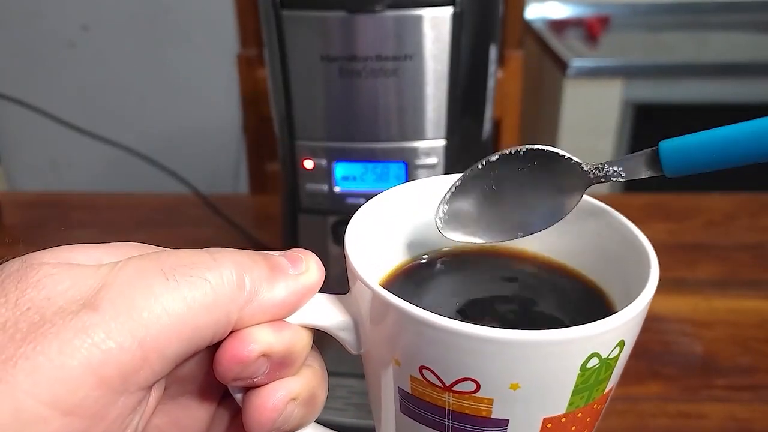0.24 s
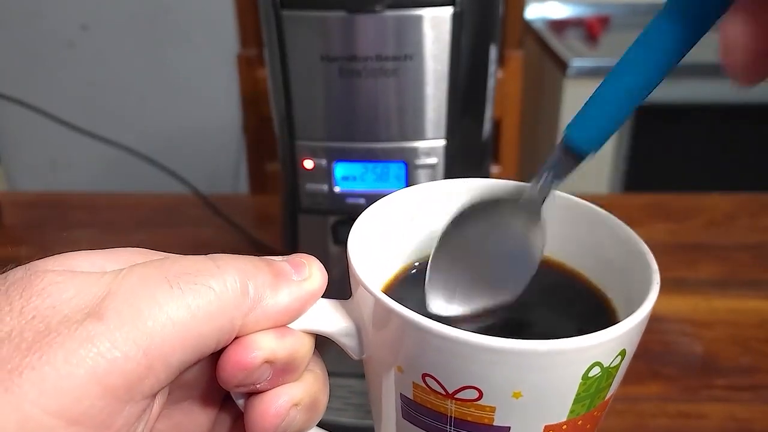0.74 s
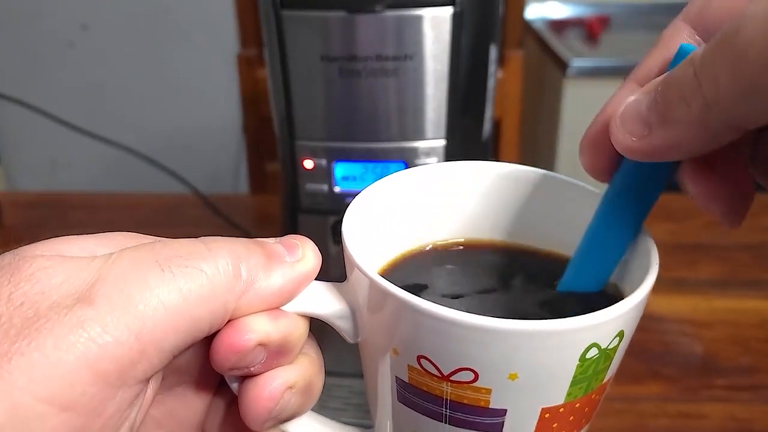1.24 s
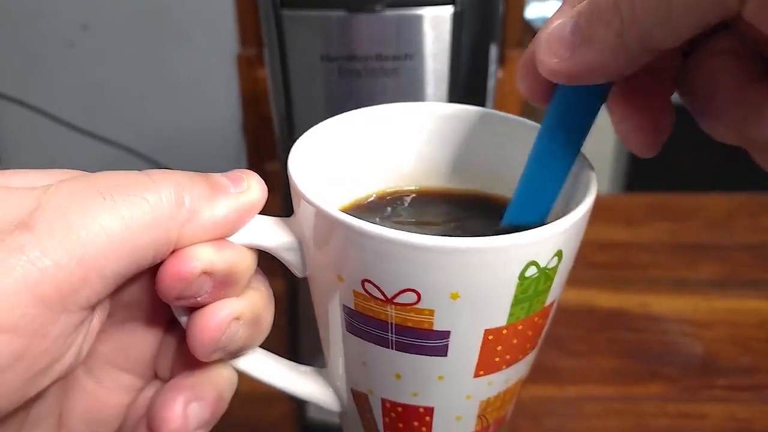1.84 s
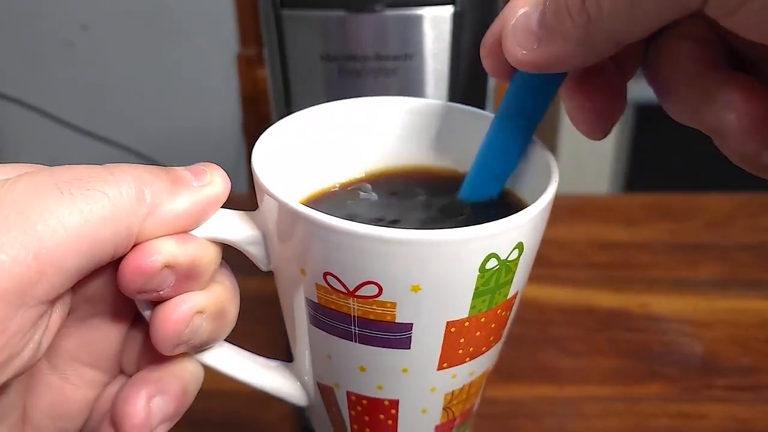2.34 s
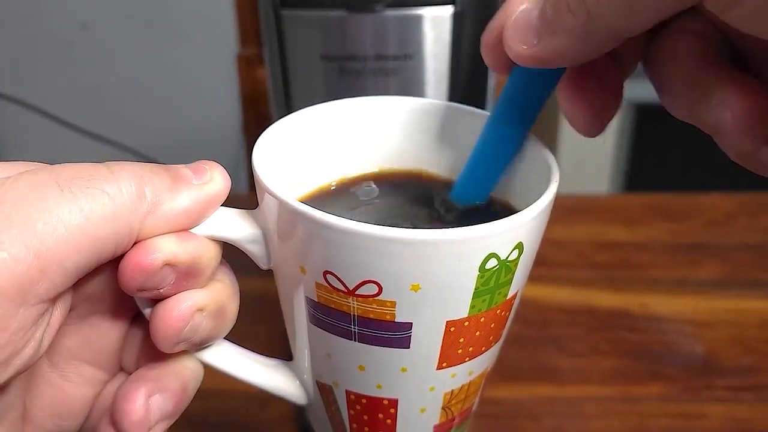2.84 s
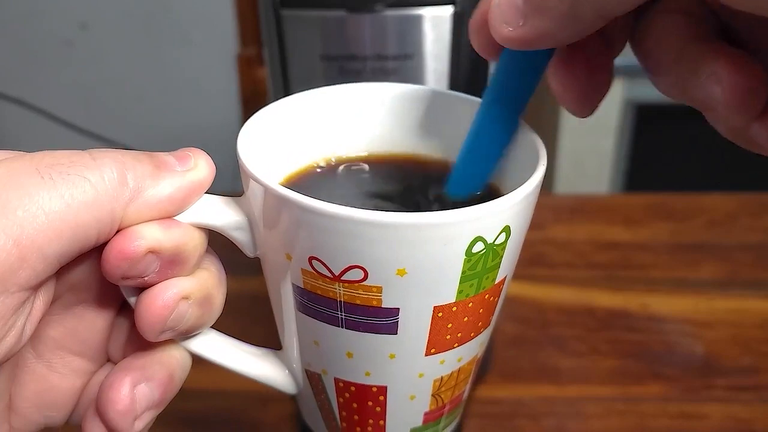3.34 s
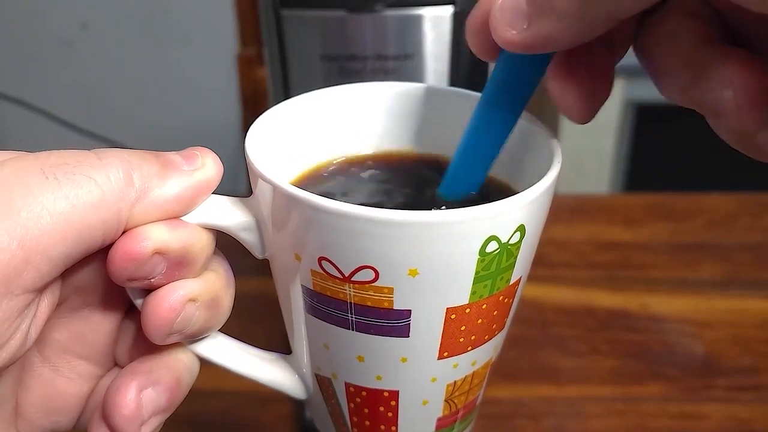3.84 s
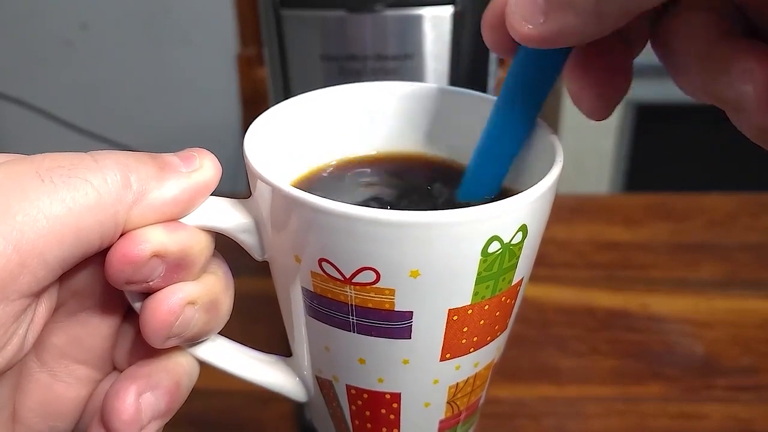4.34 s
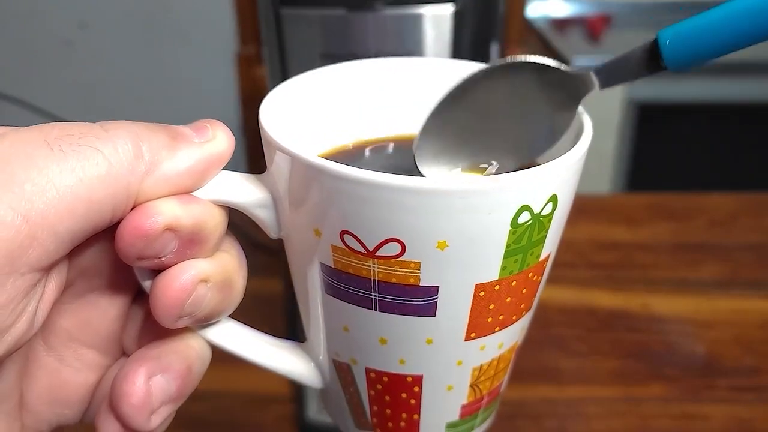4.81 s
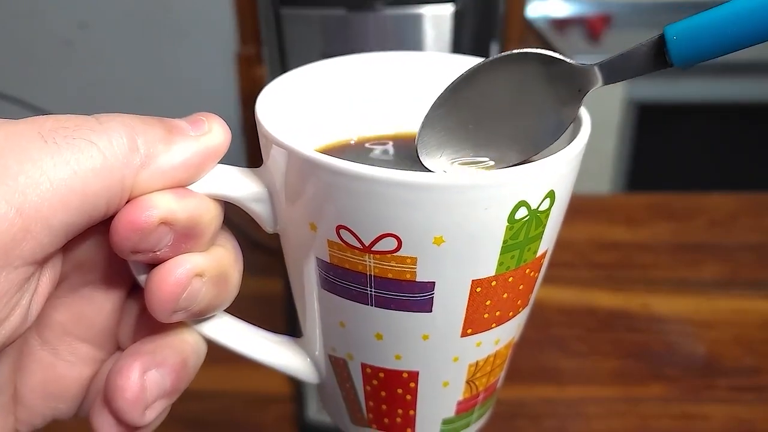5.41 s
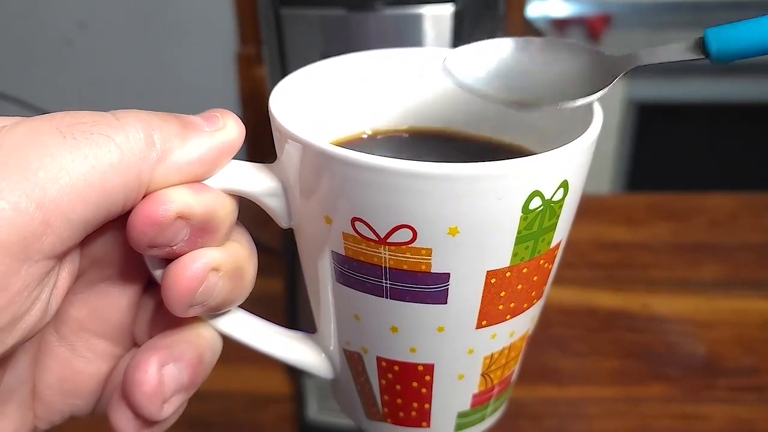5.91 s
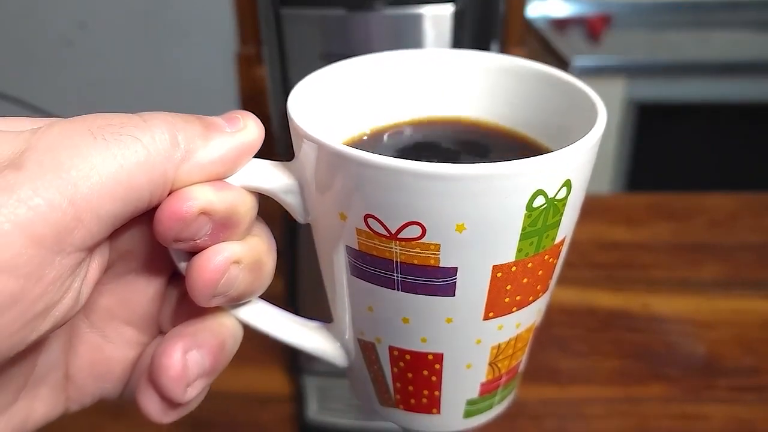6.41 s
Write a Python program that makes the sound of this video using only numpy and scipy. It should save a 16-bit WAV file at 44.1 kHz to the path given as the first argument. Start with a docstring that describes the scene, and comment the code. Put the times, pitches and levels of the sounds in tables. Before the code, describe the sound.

A teaspoon and ceramic mug heard very close, with short kitchen reflections. A barely audible trickle of sugar, a hard bright clink, then about three seconds of irregular small taps, wet and damped by the drink, with thin scrapes along the wall. A pause, then strong high rim taps with short ringing, weaker ones, and a last clink. Faint low hum and room noise; hiss dips after loud hits.

```python
"""A steel teaspoon knocks sugar into a ceramic mug, stirs the drink and is tapped dry on the rim.
Each contact is a noise crack plus decaying modes of mug and spoon; some modes sing on afterwards.
Between taps the spoon drags along the wall (stick-slip pulses) and the drink laps (short bubble rings).
A small kitchen answers, over mains hum and low room noise; a noise suppressor hushes the hiss
after loud clinks."""
import sys
import numpy as np
from scipy import signal
from scipy.fft import rfft, irfft
from scipy.io import wavfile
from scipy.ndimage import uniform_filter1d

SR = 44100
rng = np.random.default_rng(int(sys.argv[2]) if len(sys.argv) > 2 else 0)


def dump(signal):
    """Clip the signal to [-1, 1] and save it as 16-bit WAV at the path in sys.argv[1]."""
    limited = np.clip(np.atleast_2d(signal).T, -1, 1)
    pcm = np.round(limited * 32767).astype(np.int16)
    wavfile.write(sys.argv[1], SR, pcm)


N = 293946

# Modes: (frequency [Hz], level [dB], t60 [s], level change with the spoon deep in the drink [dB])
# the mug's oval modes, split by its handle
MUG_LOW_MODES = [(830, -22, .035, -2), (1557, -6, 0.18, 2.5), (1652.6, 12, 0.13, -7),
                 (1730, -5.5, 0.075, -22)]
# the spoon's bowl
SPOON_MODES = [(4690, -26, .22, -10), (4753, -20, .24, -12), (4830, -26, .22, -14), (5440, -7, .04, 0),
               (5522, 0, .05, 3), (6400, -6, .04, -8), (6490, -2, .06, -9), (8050, -15, .1, 2),
               (8400, -16, .17, -1), (10440, -28, .26, -10), (11590, -27, .22, -8)]
# stiff, quickly damped modes that only a sharp blow reaches
BRIGHT_MODES = [(7420, 9.5, 0.032, -24.5), (7700, -1.5, .02, -31.5), (8180, 6, 0.012, -3.5),
                (8610, -1.5, 0.023, 13.5), (8817, 2.5, 0.12, -6.5), (10050, -16.5, 0.031, 16),
                (10335, -10.5, 0.064, 6), (10560, -8, 0.08, 8), (11600, -18, 0.042, 18),
                (13150, -15.5, 0.044, 12), (13500, -10, 0.05, -2), (15200, -3, 0.033, -2),
                (15600, -15, .03, -8)]
# dull modes of spoon and mug in touch
DULL_MODES = [(1900, 0, .02, -3), (2070, -7, .11, -2), (2500, -8, .1, 0), (2900, -7, .06, -2),
              (3260, -9, .08, -3), (3660, -7, .08, 3), (4450, -3, .02, 0), (4850, 0, .02, 0)]

DEEP_FROM_S, DEEP_TO_S = 1, 4.4  # the spoon is deep in the mug


def amp(db):
    """Decibels to gain."""
    return 10 ** (np.asarray(db) / 20)


def unit(x):
    """Scales to rms 1."""
    return x / np.sqrt(np.mean(x ** 2) + 1e-20)


def read(points, hz):
    """Interpolates (frequency, value) points on a log-frequency axis."""
    point_hz, value = np.transpose(points)
    return np.interp(np.log(hz + 1), np.log(point_hz + 1), value)


def coloured(x, spectrum):
    """Filters x by a spectrum in dB, at rms 1."""
    hz = np.fft.rfftfreq(len(x), 1 / SR)
    return unit(irfft(rfft(x) * amp(read(spectrum, hz)), len(x)))


def wander(hz):
    """Random modulation of rms 1, up to about hz changes a second."""
    f = np.fft.rfftfreq(N, 1 / SR)
    return unit(irfft(rfft(rng.standard_normal(N)) * np.exp(-(f / hz) ** 2), N))


def add(mix, s, sound):
    """Mixes a sound in at time s."""
    part = mix[round(s * SR):][:len(sound)]
    part += sound[:len(part)]


def dying(t, t60):
    """Exponential decay: falls by 60 dB in t60 seconds."""
    return np.exp(-np.log(1000) * t / max(t60, 1e-3))


def stroke(start_s, length_s, attack_s, release_t60):
    """Envelope of one movement: it rises, holds until its length is over and dies away."""
    t = np.arange(N) / SR - start_s
    return np.clip(t / attack_s, 0, 1) * dying(np.maximum(t - length_s, 0), release_t60)


def ring(t, modes, deep, vary_db, detune=0.00035):
    """Decaying modes; every point of contact weights and loads them a little differently."""
    total = 0
    for hz, db, t60, deep_change_db in modes:
        level_chance, pitch_chance = rng.standard_normal(2)
        gain = amp(db + deep * deep_change_db + vary_db * level_chance)
        mode_hz = hz * (1 + detune * pitch_chance)
        total = total + gain * dying(t, t60) * np.sin(2 * np.pi * mode_hz * t)
    return total


def patchy(x, depth_db, frames, bins):
    """The point of contact wanders, so single bands swell and fade."""
    z = signal.stft(x, nperseg=256)[2]
    patches = uniform_filter1d(rng.standard_normal(z.shape), bins, axis=0)
    patches = unit(uniform_filter1d(patches, frames, axis=1))
    return unit(signal.istft(z * amp(depth_db * patches), nperseg=256)[1][:N])


def rubbed(drive, ring_db, mug_db=-9):
    """Steady rubbing feeds the modes of spoon and mug."""
    t = np.arange(SR // 8) / SR
    body = ring(t, DULL_MODES + BRIGHT_MODES + SPOON_MODES, deep=True, vary_db=5.5)
    body = body + amp(mug_db) * ring(t, MUG_LOW_MODES, deep=True, vary_db=1.5)
    resonance = unit(signal.fftconvolve(drive, body)[:N])
    return patchy(drive + amp(ring_db) * resonance, depth_db=2.8, frames=12, bins=4)


def background(rumble_db=-52, hiss_db=-66, waver=0.52, sway_rad=0.43):
    """Hum lines wavering in level and phase, over low room noise and a faint hiss."""
    # mains hum and fan: (frequency [Hz], rms level before the waver [dB])
    hum_lines = [(60.1, -53), (78.5, -68.5), (119.8, -84), (180.2, -58), (241, -68.5), (301, -66.5),
                 (361, -72), (421, -70)]
    # low room noise: (frequency [Hz], density [dB per Hz])
    rumble_colour = [(20, 8), (35, 0), (48, 0), (80, 6), (140, -0.5), (280, -3), (420, -5.5), (560, -12.5),
                     (750, -18), (1050, -25), (1400, -44.5), (2200, -68), (5000, -70)]
    # hiss: (frequency [Hz], density [dB per Hz])
    hiss_colour = [(500, -13), (1050, -1), (1650, 0.5), (2000, -5.5), (2140, 0.5), (2350, -7), (3000, -9.5),
                   (3750, -12), (4300, -19), (7500, -14.5), (9500, -27), (16000, -40)]
    t = np.arange(N) / SR
    hum = np.zeros(N)
    for hz, db in hum_lines:
        level = amp(db) * np.sqrt(2) * (1 + waver * wander(20))
        phase = 2 * np.pi * (hz * t + rng.random()) + sway_rad * wander(2.3)
        hum += level * np.sin(phase)
    rumble = amp(rumble_db) * coloured(rng.standard_normal(N), rumble_colour)
    hiss = amp(hiss_db) * coloured(rng.standard_normal(N), hiss_colour)
    return hum + rumble + hiss


def sugar(level_db=-74, pour_s=.07):
    """Fine crystals slide off the spoon and trickle into the drink: coloured noise."""
    # (frequency [Hz], density [dB per Hz])
    sugar_colour = [(1500, -9), (3700, 9.5), (5000, 0.5), (6800, -9.5), (8300, -8), (9500, -21),
                    (11000, -14), (16000, -21)]
    trickle = amp(level_db) * coloured(rng.standard_normal(N), sugar_colour)
    return trickle * stroke(0, pour_s, attack_s=0.0037, release_t60=.5)


def stirring(level_db=-74.5, swing_db=2.5, turns_hz=2.3, peak_s=1.22):
    """Gain of the drink's motion: one swell for each turn while the spoon is in it."""
    sweep = np.cos(2 * np.pi * turns_hz * (np.arange(N) / SR - peak_s))
    stay = stroke(DEEP_FROM_S, DEEP_TO_S - DEEP_FROM_S, attack_s=0.24, release_t60=.3)
    return amp(level_db + swing_db * sweep) * stay


def swirl(bubbles_per_s=1400, size_db=2, decay_cycles=12, pitches=24):
    """Tiny bubbles and lappings around the spoon, each a short ring, heard through the mug."""
    # (frequency [Hz], density [dB per Hz])
    swirl_colour = [(500, -20.5), (1500, -6.5), (2400, -14), (3600, 23), (5000, 14), (8000, 5),
                    (12000, -19.5), (16000, -35.5)]
    t, bubbles = np.arange(2048) / SR, np.zeros(N)
    for hz in np.geomspace(1300, 7000, pitches):
        starts = rng.random(N) < bubbles_per_s / pitches / SR
        pops = starts * amp(size_db * np.minimum(rng.exponential(1, N), 3))
        bubble = np.sin(2 * np.pi * hz * t) * t * hz * np.exp(-2 * np.pi * t * hz / decay_cycles)
        bubbles += signal.oaconvolve(pops, bubble)[:N]
    drive = coloured(unit(bubbles) + .4 * rng.standard_normal(N), swirl_colour)
    return rubbed(drive, ring_db=3.5) * stirring()


def pressure(swell_db=3, attack_s=0.013, release_t60=0.29):
    """Gain of the drags: each catches quickly, presses harder along its length and lets go."""
    # spoon on the glaze: (start [s], length [s], level at the end of the swell [dB])
    drags = [(1.514, 0.24, -53.5), (2.614, 0.18, -64.5), (3.18, 0.065, -56.5)]
    t, gain = np.arange(N) / SR, np.zeros(N)
    for s, length_s, db in drags:
        remaining = np.clip(1 - (t - s) / length_s, 0, 1)
        gain += amp(db - swell_db * remaining) * stroke(s, length_s, attack_s, release_t60)
    return gain


def scrape(slip_hz=900, drift=.1, jitter=0.26, grit=0.43, uneven_db=2.0, lean_db=2.0):
    """The spoon's edge sticks and slips unevenly on the glaze, with sugar grit under it."""
    # (frequency [Hz], density [dB per Hz])
    scrape_colour = [(600, 2), (1600, 2.5), (2700, 7.5), (4000, 1.5), (6000, 6), (8000, -0.5), (10500, -4),
                     (13500, 2), (15500, -4), (16500, -17)]
    slips_per_s = slip_hz * np.exp(drift * wander(6.4) + jitter * wander(900))
    slips = np.diff(np.floor(np.cumsum(slips_per_s) / SR), prepend=0)  # one pulse a slip
    drive = unit(slips - slips.mean()) + grit * rng.standard_normal(N)
    drive = coloured(drive * amp(uneven_db * wander(90)), scrape_colour)
    return rubbed(drive, ring_db=-4.0) * pressure() * amp(lean_db * wander(19))


def sings(spread=.014, count=9):
    """Modes left ringing freely after contact: close clusters of sines beating together."""
    # spoon or mug after the two part: (time [s], frequency [Hz], level [dB], t60 [s])
    singing_modes = [(.505, 4765, -37.5, .28), (.505, 2506, -47, 0.37), (2.354, 7360, -60.5, 0.51),
                     (2.683, 1670, -61, .45), (2.917, 7460, -62.5, .26), (3.481, 1680, -49, .5),
                     (3.755, 7450, -54.5, 0.45), (4.832, 4750, -48.5, 0.58), (5.003, 4730, -48.5, 0.43),
                     (5.235, 4700, -52, .42)]
    out, t = np.zeros(N), np.arange(SR // 2) / SR
    for s, hz, db, t60 in singing_modes:
        cluster = 0
        for chance in rng.standard_normal(count):
            cluster = cluster + np.sin(2 * np.pi * hz * (1 + spread * chance) * t)
        add(out, s, amp(db) * cluster / np.sqrt(count) * dying(t, t60))
    return out


def contact_colour(x, depth_db, width_hz=700):
    """Every point of contact favours some broad bands and misses others."""
    hz, knots_hz = np.fft.rfftfreq(len(x), 1 / SR), np.arange(0, SR / 2, width_hz)
    ripple_db = depth_db * np.interp(hz, knots_hz, rng.standard_normal(len(knots_hz)))
    return irfft(rfft(x) * amp(ripple_db), len(x))


def crack(t, spectrum, t60):
    """The crowd of heavily damped modes at the moment of contact: decaying coloured noise."""
    noise = contact_colour(rng.standard_normal(len(t)), depth_db=1.5)
    return coloured(noise, spectrum) * dying(t, t60)


def struck(x, db):
    """Sets the rms of a blow's first 20 ms."""
    return amp(db) * x / np.sqrt(np.mean(x[:SR // 50] ** 2))


def share(hardness, back_db, edge_db):
    """A blow's share in dB over its strength, from the spoon's back to its edge."""
    return back_db + hardness * (edge_db - back_db)


def taps(touch_s=0.011, rise_s=0.00086, knock_noise_db=1, dull_db=-7, tick_noise_db=-6,
         wet_noise_db=4, loading=0.011, firm_db=-52, drowned_db=-15.5, mug_hold=0.56, spoon_hold=1.35):
    """Steel meets ceramic: a crack, then both bodies ring, losing most while they stay in touch."""
    # hardness 0 is the spoon's back, 1 its edge: (time [s], strength [dB], hardness [0-1],
    # wall ring over the strength [dB], ring lost while the two stay in touch [dB])
    contacts = [(.5043, -29.5, 0.75, -7.5, 23), (1.0867, -58, 0.75, -19, 18), (1.09, -51, 0, -27, 43),
                (1.327, -60, 0.16, -31, 0), (1.523, -66.5, 1, -8, 35.5), (1.6308, -48, 0.06, -7, 33),
                (1.913, -64, .35, -41, 0.5), (1.9565, -66, .4, -5, -15), (2.0536, -44.5, .9, -1, 16),
                (2.233, -52, .0, -11.5, 37), (2.2736, -57, 0.56, -12, -3), (2.3035, -51, 0.1, -14, 31),
                (2.3559, -52.5, 0.24, -64, 23), (2.6811, -53, 0.71, 7.5, 7), (2.781, -57, 0.6, -8, 3),
                (2.824, -49.5, .05, -12, 26), (2.92, -55.5, 0.21, -50, 17), (2.987, -52, 0.31, -19, 5),
                (3.287, -59.5, .95, -12, 21.5), (3.314, -58.5, .1, -4.5, 2.5),
                (3.341, -50.5, 0.14, -20, 40), (3.4807, -43.5, 0.56, 21, 9), (3.668, -48, 1, 2, 11.5),
                (3.758, -47, 0.3, -32, 24), (4.0015, -54, .55, -10, 17), (4.004, -49.5, 0.54, -9, -9),
                (4.1322, -45.5, 0.94, -2, 15), (4.2823, -51, 0.1, 4, -3), (4.347, -49.5, .0, -20, 24.5),
                (4.4333, -48.5, 0.34, 5, -1.5), (4.8311, -34, 0.66, 9, 9), (5.003, -39, 0.58, 8, 18),
                (5.2342, -38.5, 0.56, 6, 7), (5.4514, -49.5, 0.42, 7, 15), (5.6506, -51.5, 0.45, 6.5, 28.5),
                (5.835, -41, .6, 17.5, 13)]
    # higher wall modes: (frequency [Hz], level [dB], t60 [s], level change deep in the drink [dB])
    mug_high_modes = [(4737, -12.5, 0.19, 1), (5730, -13.5, .04, 25.5), (5710, 4, .075, -32),
                      (6870, -6, 0.067, 6.5), (8040, -20.5, .2, 4.5), (8780, -17.5, 0.047, -2.5),
                      (10830, -24, .16, -11), (14250, -31, .11, -6.5), (15300, -27.5, .11, -8.5)]
    # dull contact noise: (frequency [Hz], density [dB per Hz])
    knock_colour = [(300, -44), (650, -24.5), (850, -9), (1050, -21), (1500, 5), (2200, 3.5), (2900, -1.5),
                    (3600, 1.5), (4900, 2), (6800, 4.5), (8600, -20), (9600, -23.5), (16000, -40.5)]
    # bright contact noise: (frequency [Hz], density [dB per Hz])
    tick_colour = [(1500, -32.5), (4000, -13.5), (6500, 3.5), (8500, 6), (9400, 3.5), (10800, 4),
                   (12300, -6), (13700, -7.5), (15500, -2.5), (17000, -4.5)]
    out, t = np.zeros(N), np.arange(SR // 2) / SR
    for s, knock_db, hardness, wall_db, lost_db in contacts:
        tick_db = knock_db + share(hardness, back_db=-17.5, edge_db=4)
        spoon_db = knock_db + share(hardness, back_db=-24.5, edge_db=17)
        low_db = knock_db + share(hardness, back_db=18, edge_db=-0.5)
        deep = DEEP_FROM_S < s < DEEP_TO_S  # the moving drink loads the stiff modes anew at each blow
        skid = np.clip(amp(firm_db - knock_db), 1, 3)  # light contacts glance along the wall, last longer
        rise = 1 - np.exp(-t / (rise_s * skid))
        touch = rise * amp(-lost_db * (1 - np.exp(-t / touch_s)))
        knock = rise * crack(t, knock_colour, t60=0.015 * skid)
        tick = rise * crack(t, tick_colour, t60=0.0083 * skid)
        dull = touch * ring(t, DULL_MODES, deep, vary_db=11.5, detune=0.023 + deep * 0.012)
        bright = touch * ring(t, BRIGHT_MODES, deep, vary_db=6.5, detune=0.0017 + deep * loading)
        # in touch, the heavy mug is affected less than the light spoon
        mug_low = touch ** mug_hold * ring(t, MUG_LOW_MODES, deep, vary_db=2.0)
        mug_high = touch * ring(t, mug_high_modes, deep, vary_db=0.37)
        spoon = touch ** spoon_hold * ring(t, SPOON_MODES, deep, vary_db=3.3)
        blow = struck(knock, knock_db + knock_noise_db)
        blow += struck(tick, tick_db + tick_noise_db + deep * wet_noise_db)
        blow += struck(dull, knock_db + dull_db)
        blow += struck(bright, tick_db)
        blow += struck(mug_low, low_db + deep * drowned_db)  # under the surface it is stirred less
        blow += struck(mug_high, knock_db + wall_db)
        blow += struck(spoon, spoon_db)
        add(out, s, blow)
    small_body = signal.butter(4, 720, "highpass", fs=SR, output="sos")
    return signal.sosfilt(small_body, out)  # so small a body radiates little bass


def kitchen(x, delay_s=0.0062):
    """Dense reflections from counter and walls: noise, each band dying at its own speed."""
    # (frequency [Hz], t60 [s])
    room_decay = [(300, 0.25), (1600, 0.35), (4700, 0.24), (6000, 0.16), (8500, 0.25), (12000, 0.36),
                  (16000, 0.29)]
    hz, t, z = signal.stft(rng.standard_normal(SR // 2), SR, nperseg=256)
    decay = np.exp(-np.log(1000) * t / read(room_decay, hz)[:, None])
    tail = signal.istft(z * decay, SR, nperseg=256)[1]
    tail = np.concatenate([np.zeros(round(delay_s * SR)), tail])
    return signal.fftconvolve(x, tail / np.linalg.norm(tail))[:N]


def scene(room_db=-9.0, turn_hz=0.5947):
    """The mug moves in the hand, so its reflections keep changing; both channels hear the same."""
    near = taps() + sings() + scrape() + swirl() + sugar()
    turn = 2 * np.pi * turn_hz * np.arange(N) / SR
    wet = kitchen(near * np.cos(turn)) + kitchen(near * np.sin(turn))
    return np.tile(near + amp(room_db) * wet + background(), (2, 1))


def suppressor(x, memory_s=.46, learn_s=.45, trigger_db=4, slope=2.2, deepest_db=26, open_db=5):
    """Learns the noise from the start; after loud sound, turns a band down as it nears the noise."""
    size, hop = 512, 128  # samples
    z = signal.stft(x, nperseg=size, noverlap=size - hop)[2]
    power = uniform_filter1d((abs(z) ** 2).mean(0), size=3, axis=0)
    power = uniform_filter1d(power, size=5, axis=1).clip(1e-20)
    noise = power[:, :round(learn_s * SR / hop)].mean(1, keepdims=True)
    over = power / noise
    frames = round(memory_s * SR / hop)
    recent_db = 10 * np.log10(signal.lfilter(np.ones(frames) / frames, 1, over) + 1e-9)
    cut_db = np.clip(slope * (recent_db - trigger_db), 0, deepest_db)
    cut_db = cut_db / (1 + over / amp(open_db) ** 2)  # loud bands stay open
    return signal.istft(z * amp(-cut_db), nperseg=size, noverlap=size - hop)[1][:, :N]


def record(dry, edge_hz=16100):
    """The recorder's noise suppressor and band limit."""
    edge = signal.firwin(255, edge_hz, window=("kaiser", 9), fs=SR)
    return signal.oaconvolve(suppressor(dry), edge[None], "same")


dry = scene()
out = record(dry)
dump(out)
```